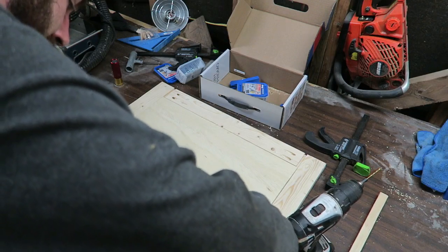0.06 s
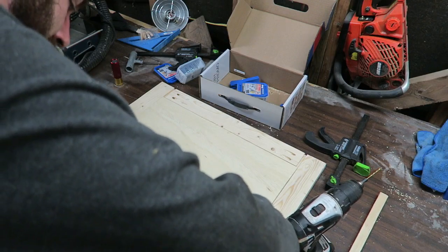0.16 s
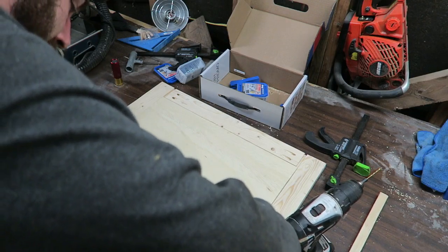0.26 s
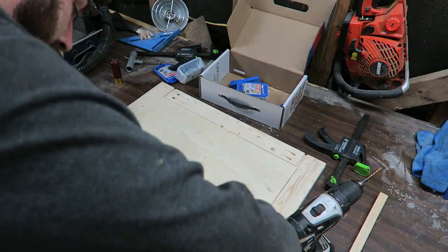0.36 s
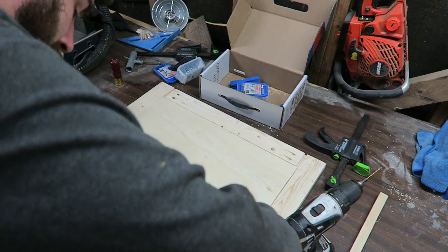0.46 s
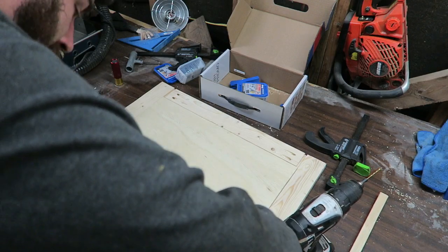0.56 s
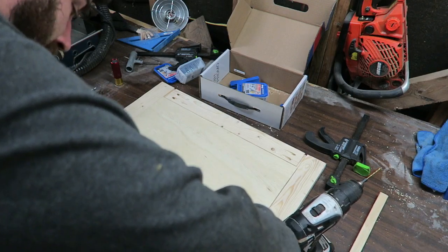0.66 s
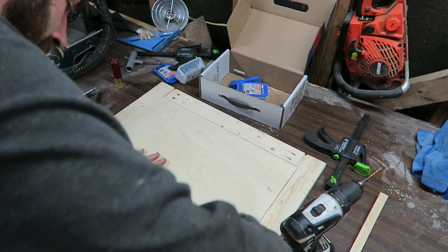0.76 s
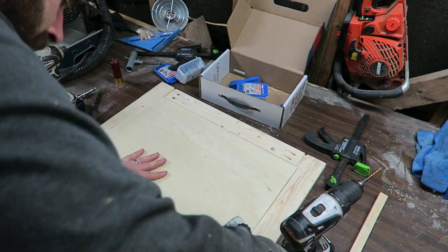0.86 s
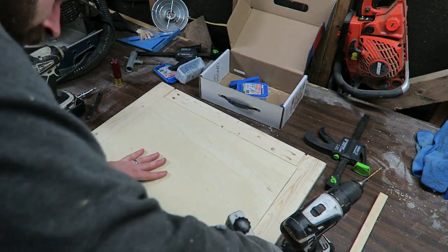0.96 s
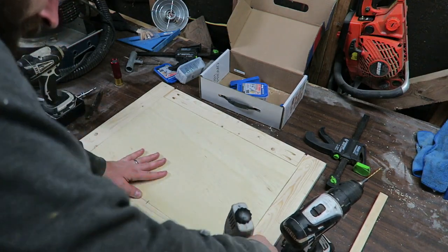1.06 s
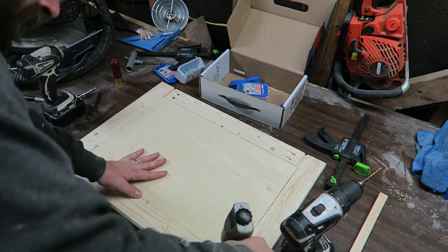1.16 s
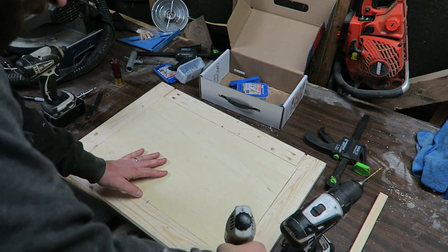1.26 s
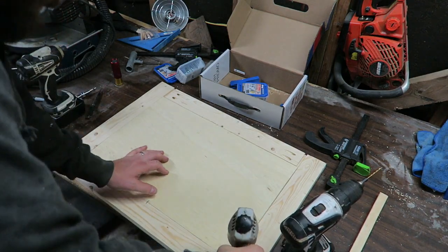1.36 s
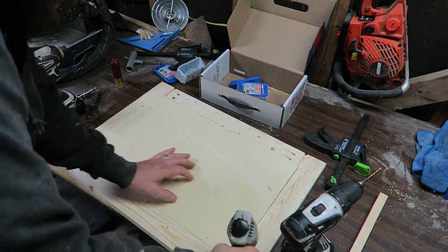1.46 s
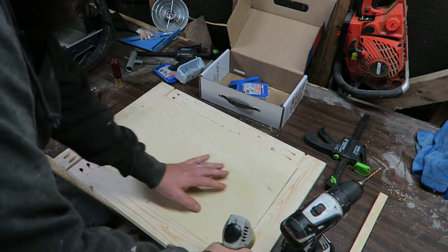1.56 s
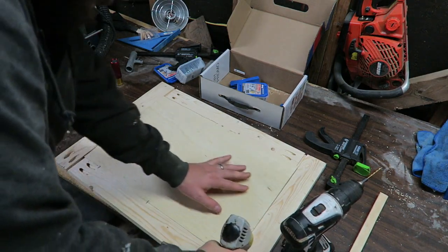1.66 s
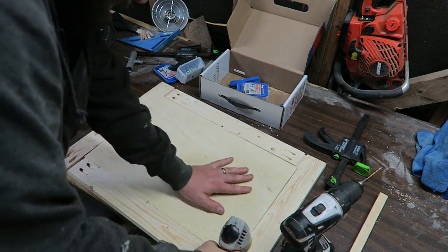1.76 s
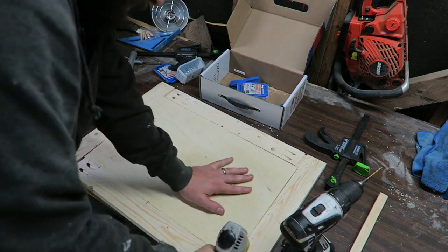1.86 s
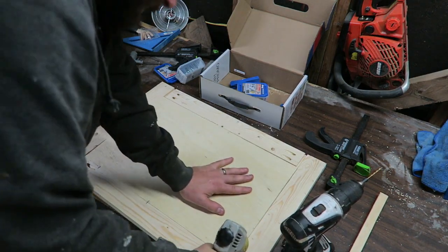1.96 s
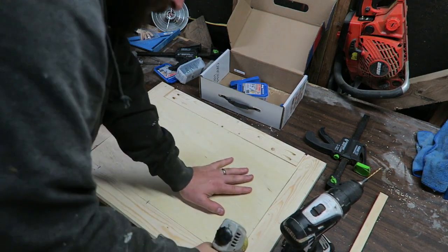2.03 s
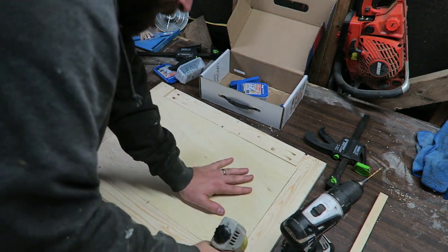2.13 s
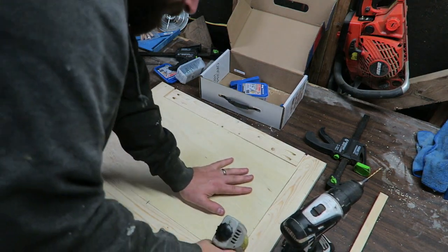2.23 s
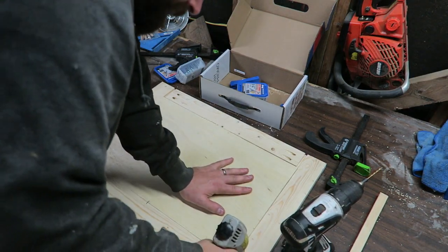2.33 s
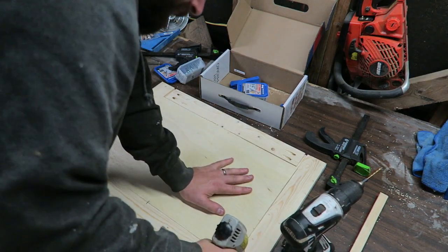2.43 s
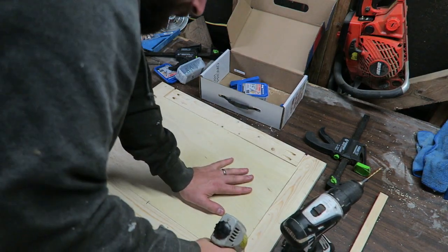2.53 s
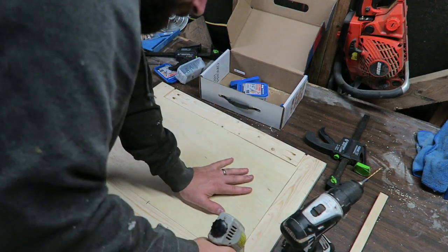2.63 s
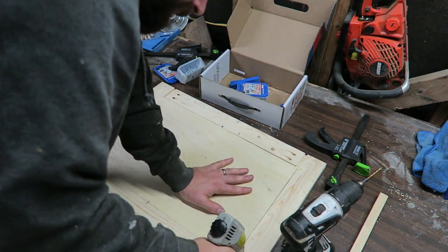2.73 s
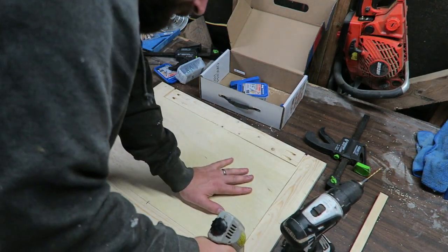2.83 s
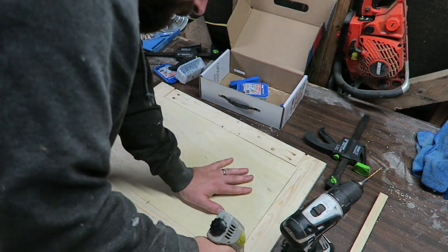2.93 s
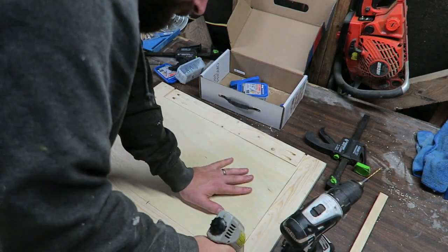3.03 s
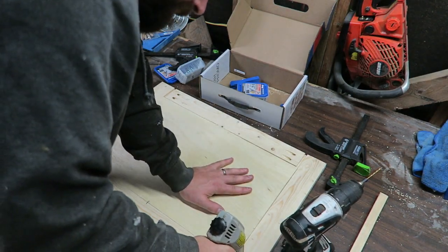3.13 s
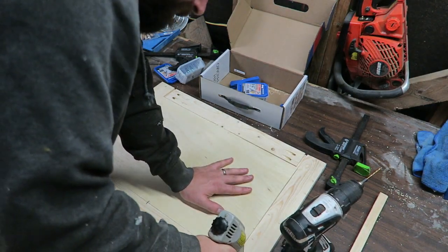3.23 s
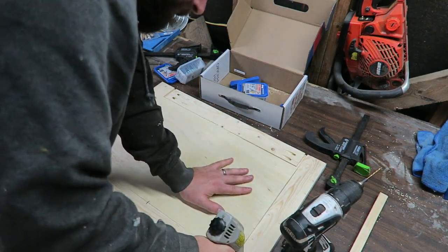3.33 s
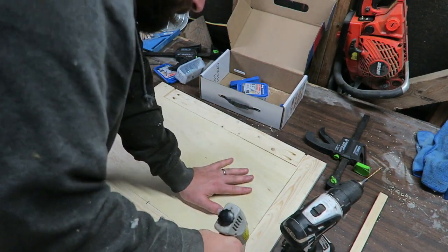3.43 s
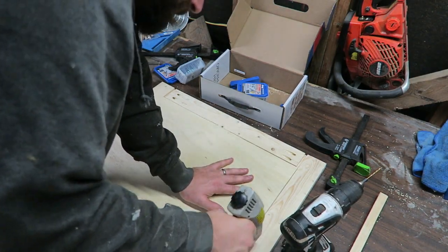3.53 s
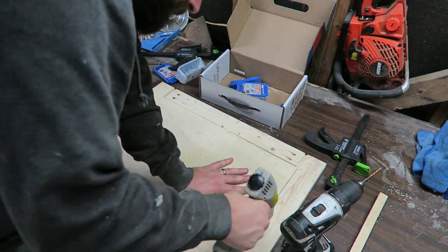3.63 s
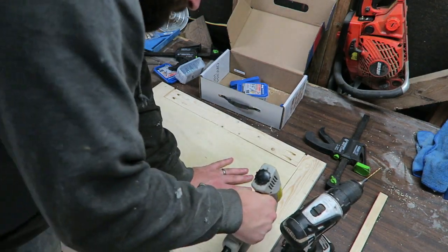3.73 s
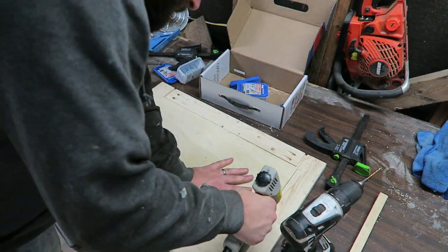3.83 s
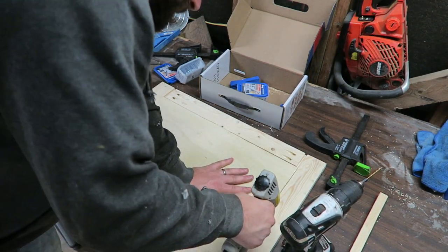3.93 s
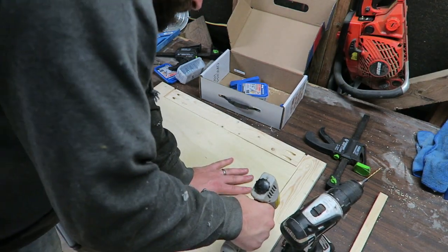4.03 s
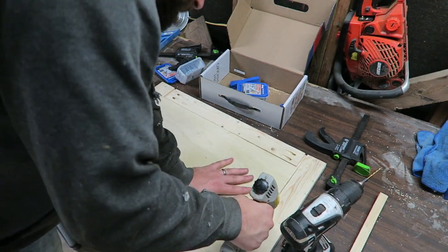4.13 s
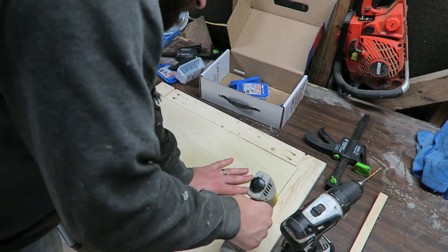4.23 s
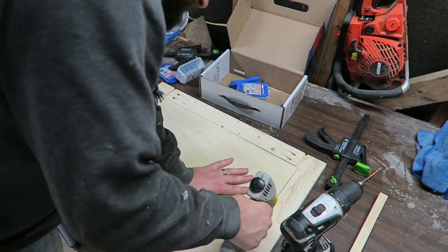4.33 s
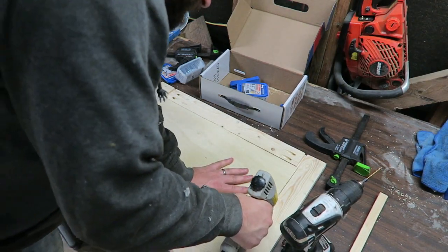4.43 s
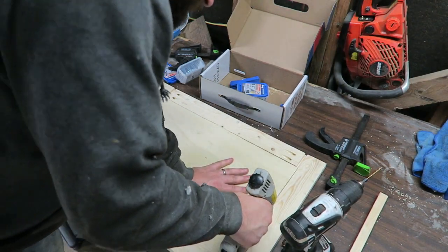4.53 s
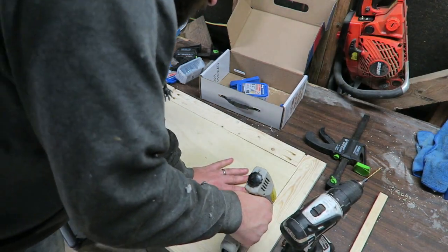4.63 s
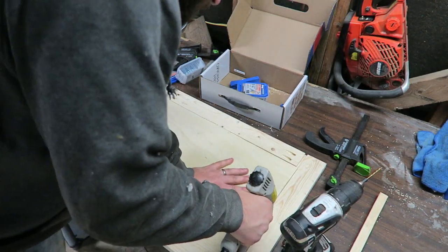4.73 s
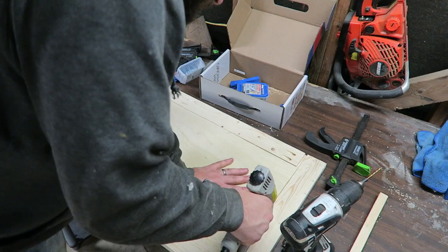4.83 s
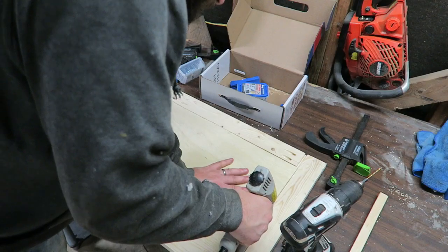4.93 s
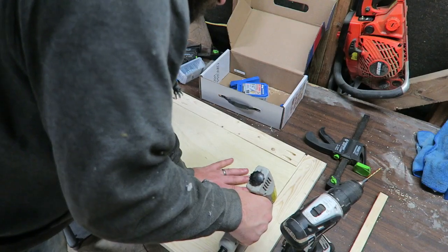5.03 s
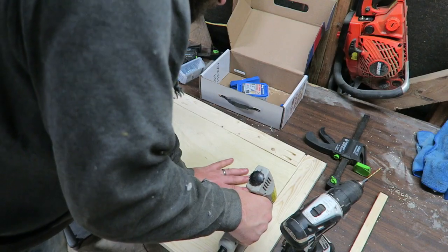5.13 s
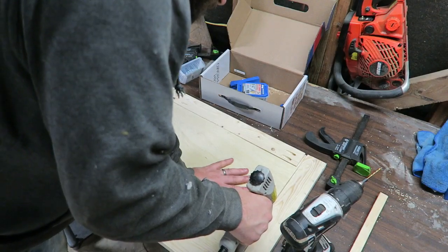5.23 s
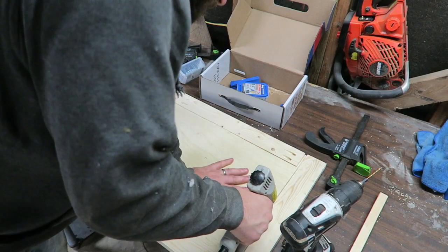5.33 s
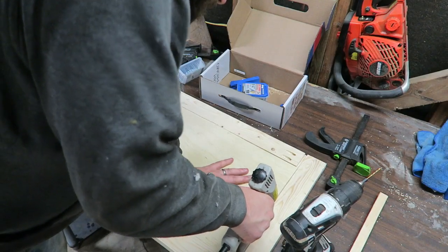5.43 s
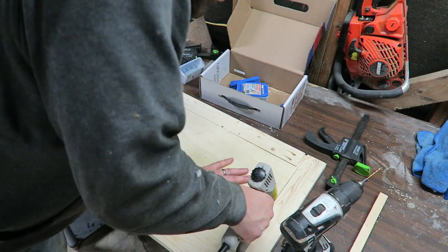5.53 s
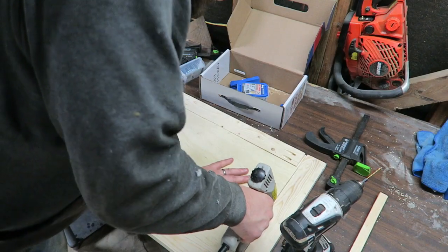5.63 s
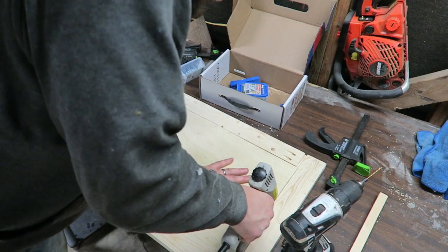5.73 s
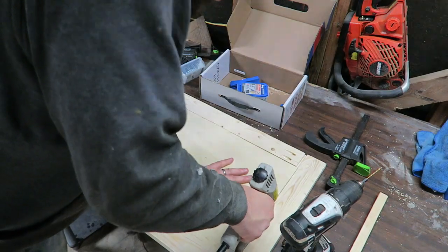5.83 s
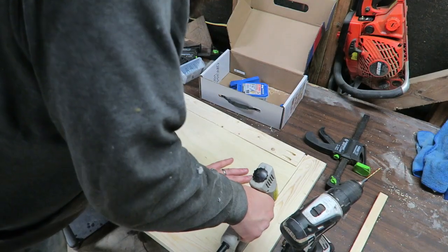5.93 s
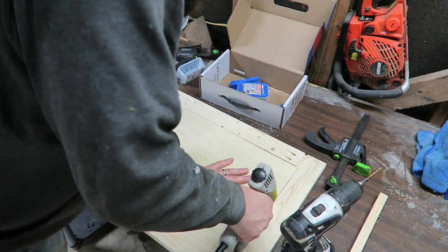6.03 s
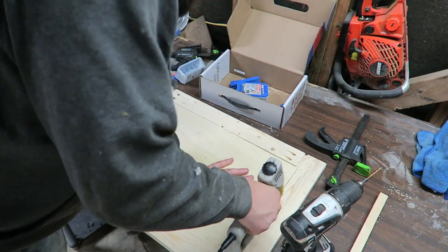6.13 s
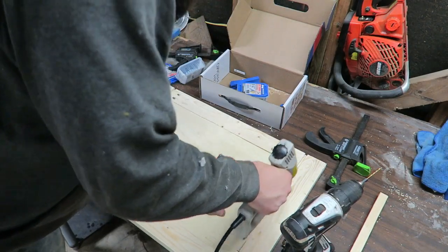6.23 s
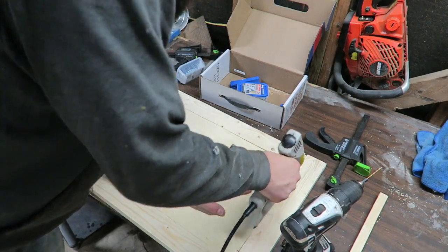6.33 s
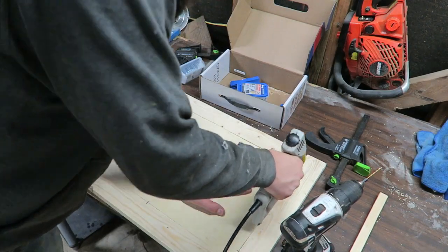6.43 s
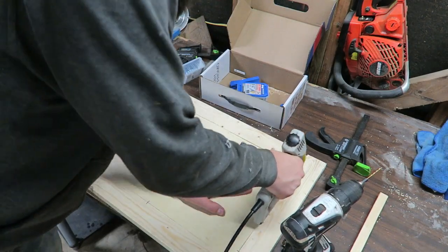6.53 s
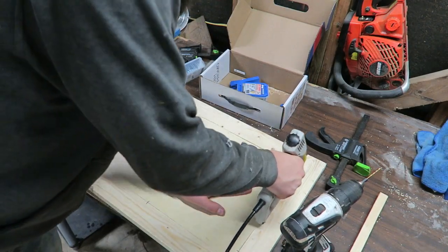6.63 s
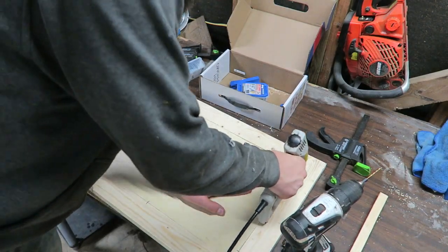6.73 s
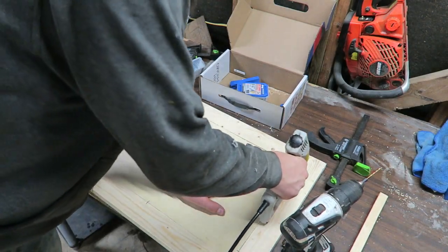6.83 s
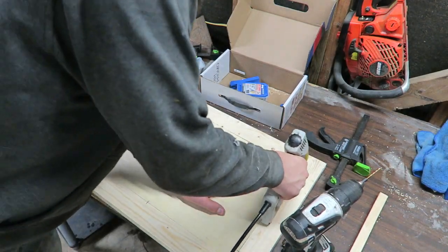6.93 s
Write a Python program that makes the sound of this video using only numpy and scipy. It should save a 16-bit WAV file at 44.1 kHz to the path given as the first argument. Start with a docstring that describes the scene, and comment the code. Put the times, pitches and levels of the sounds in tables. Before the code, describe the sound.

An electric staple gun fires into plywood three times, close to the microphone and nearly three seconds apart. Each shot is a sharp, slightly distorted snap with a woody thud and a brief workshop echo. After the first, the board shifts and knocks against the bench. Faint rubbing and light clicks lead to the other two shots, and a click and a dull bump follow the last, over a low room rumble.

```python
"""An electric staple gun fires three times, close up, into plywood on a workbench in a workshop.
Each shot is a trigger click, the plunger's rattling run and a blow that rings board, bench and room.
The blow overloads the recorder, whose gain then ducks and creeps back. Between shots the gun and
the board are knocked, rubbed and slid, a loose part clinks and the shell creaks, over a low rumble."""
import sys
import numpy as np
from scipy import signal
from scipy.fft import rfft, irfft
from scipy.io import wavfile
from scipy.ndimage import uniform_filter1d, minimum_filter1d

SR = 44100
rng = np.random.default_rng(int(sys.argv[2]) if len(sys.argv) > 2 else 0)


def generate_wav(signal):
    """Clip the signal to [-1, 1] and save it as 16-bit WAV at the path in sys.argv[1]."""
    frames = np.transpose(np.atleast_2d(signal))
    scaled = np.clip(frames, -1, 1) * 32767
    pcm = np.round(scaled).astype(np.int16)
    wavfile.write(sys.argv[1], SR, pcm)


N = 307817

# Tone of the room's air and of its rumble. Each row: frequency in Hz, level in dB.
AIR_COLOUR = [(12, -27.5), (25, -4), (112, -4), (213, -2), (452, -7.5), (1270, -15), (4680, -26),
              (8000, -36.5), (11000, -45), (15500, -66.5)]
RUMBLE_COLOUR = [(15, -4), (45, 1.5), (120, 2), (220, -11.5), (400, -37), (1500, -95)]
# Stereo image of the air. Each row: frequency in Hz, left-right likeness (1 is mono).
AIR_LIKENESS = [(30, 0.079), (125, .4), (290, 0.22), (1400, 0.17), (3100, .05), (7000, 0.84)]
# The rumble's swells and dips. Each row: time in seconds, level in dB.
RUMBLE_RIDE = [(0, -61.5), (.4, -62), (.9, -58.5), (1.5, -68.5), (2.2, -62.5), (2.7, -66), (3.2, -62.5),
               (3.9, -60), (4.5, -67.5), (4.95, -77), (5.2, -61.5), (5.9, -63), (6.4, -65.5), (6.98, -71)]
# Handling knocks. Each row: start in seconds, strength in dB, bench push in dB, tick in dB,
# pitch of the struck spot in Hz.
KNOCKS = [(.052, -48, -49, -69.5, 353), (0.119, -49, -38, -72.5, 124.8), (0.232, -48.5, -50.5, -54, 503),
          (.261, -46, -42, -54.5, 698), (.323, -59, -48.5, -60, 454), (.394, -44, -46.5, -57, 603),
          (.436, -52.5, -47.5, -57, 595), (.911, -45, -68, -53.5, 264.8), (0.973, -36.5, -51, -66, 372),
          (.988, -33, -56, -67, 410), (1.039, -59, -34, -70.5, 95), (1.15, -44.5, -44, -56, 238),
          (1.429, -50.5, -55, -54, 400), (1.545, -19.5, -20, -56, 439), (1.844, -49.5, -47, -55.5, 557),
          (1.861, -32, -34, -57, 524), (1.901, -28, -33, -58, 480), (1.95, -15, -18.5, -46, 340),
          (1.999, -32, -26, -61, 435), (2.076, -43, -32, -64, 433), (2.247, -45.5, -59, -65, 502),
          (2.619, -53.5, -51.5, -69, 700), (3.079, -57.5, -52.5, -59, 738), (3.167, -47.5, -52.5, -64, 447),
          (3.26, -51.5, -49.5, -55, 403.5), (4.059, -49.5, -55, -48, 388), (4.519, -42, -51, -66, 292),
          (4.869, -70, -57, -61, 1200), (5.117, -40, -49, -48.5, 521), (5.363, -50.5, -58, -65.5, 294),
          (5.429, -63, -54.5, -61.5, 1499), (5.884, -43.5, -57.5, -57.5, 528),
          (6.392, -19, -77, -43.5, 826), (6.479, -39.5, -70, -58, 260), (6.718, -23, -23, -65, 130),
          (6.789, -40, -27.5, -74, 109.2), (6.87, -47.5, -37, -60, 434)]
# Tone of a knock's tick and of its woody rattle. Each row: frequency in Hz, level in dB.
TICK_COLOUR = [(500, -18.5), (1200, 1.5), (2400, 2), (4000, -5.5), (7000, -17.5), (12000, -40),
               (16000, -66)]
CLATTER_COLOUR = [(150, -19), (450, 5), (900, 2), (1500, -9), (2500, -15), (5000, -24.5), (10000, -49),
                  (16000, -75.5)]
# Ring of the framed plywood and of the bench. Each row: pitch in Hz, level in dB, t60 in seconds.
BOARD_MODES = [(275, -0.5, 0.19), (302, 1.5, 0.06), (365, -6, 0.091), (433, 2.5, 0.29), (518, -0.5, 0.18),
               (660, -4.5, .08), (740, -5, 0.069), (820, -6, 0.38), (992.3, -8, 0.055), (1100, -7.5, 0.023),
               (1200, -8, 0.055)]
BENCH_MODES = [(74, -3.5, 0.079), (87, -7.5, 0.5), (90, -0.5, .6), (126, -5, 0.47), (150, 1, 0.28),
               (199, -5.5, .12)]
# Hands, sleeves and the gun's nose rubbing. Each row: start in seconds, hold in seconds, level in dB.
RUBS = [(.225, 0.015, -49.5), (.255, 0.011, -50), (.318, 0.0086, -64.5), (.388, 0.004, -48.5),
        (.87, .09, -59.5), (1.3, 0.18, -67), (2.238, .006, -63), (2.62, .02, -64), (2.66, 0.64, -71.5),
        (4.865, 0.01975, -84), (5.108, .035, -63.5), (5.355, .05, -70), (6.74, .05, -59.5),
        (6.85, .09, -61.5)]
# Rubs that swell as weight comes down. Each row: end in seconds, final level in dB.
PRESSES = [(.45, -42.5), (1.54, -46), (3.28, -48), (5.928, -55.5)]
# Tone of the rubbing. Each row: frequency in Hz, level in dB.
RUB_COLOUR = [(150, -23), (400, 4.5), (900, 0), (2000, -6), (4500, -15.5), (8000, -33), (14000, -65)]
# The shots. Each row: starts of trigger, plunger and blow in seconds, their three levels in dB,
# the blow's hold in seconds, board push in dB, echo send in dB, brightness in dB per octave,
# then the struck spot's pitch in Hz, level in dB and t60 in seconds.
SHOTS = [(.4515, .4652, .4715, -37, -25, -7.5, .0042, -7, 15.5, -.5, 299.4, -6.5, .11),
         (3.2817, 3.2912, 3.3022, -35, -31, -10, .008, -2.5, 15, .5, 295, -9, .16),
         (5.9289, 5.948, 5.9535, -31, -27, -9, .008, -4.5, 14, -.9, 490, -8, .25)]
# Ring of the switch and shell. Each row: pitch in Hz, width in Hz, level in dB.
TRIGGER_PEAKS = [(2120, 300, 2), (2560, 140, -3), (4170, 220, -6), (4460, 200, -7.5)]
# Tone of steel on staple and wood. Each row: frequency in Hz, level in dB.
SNAP_COLOUR = [(60, -30.5), (200, -12.5), (376, -2.5), (1060, -4), (2020, -6), (2760, -6), (3770, -9),
               (5050, -10), (9440, -19.5), (12400, -25), (13700, -28.5), (16000, -33.5)]
# Ring of a loose metal part. Each row: pitch in Hz, level in dB, t60 in seconds.
CLINK_MODES = [(1380, 3, 0.31), (2550, -1, 0.2), (3850, -4, 0.17), (5130, -4, 0.17)]
# Shoves of the board over the bench. Each row: start in seconds, hold in seconds, level in dB.
SLIDES = [(1.147, 0.041, -42.5), (1.365, .012, -55)]
# Ring of the sliding board. Each row: pitch in Hz, width in Hz, level in dB.
SLIDE_PEAKS = [(141, 8.4, 9.5), (244.5, 19, 9.5), (412, 32, -6.5), (672, 60, 0), (969, 23, -14),
               (1242, 50, -18), (1700, 120, -33)]
# Creaks in the grip. Each row: start in seconds, hold in seconds, level in dB.
CREAKS = [(2.79, 0.27, -83), (4.86, .44, -77)]
# Ring of the gun's shell. Each row: pitch in Hz, width in Hz, level in dB.
SHELL_PEAKS = [(1600, 400, -1.5), (3550, 350, 0.5), (4160, 340, -0.5)]
# The workshop's reverb time. Each row: frequency in Hz, t60 in seconds.
ECHO_DECAY = [(100, 0.94), (260, 0.5), (700, 0.55), (1840, 0.55), (4850, 0.45), (8000, 0.35), (12800, 0.1)]
# Stereo image of the echoes. Each row: frequency in Hz, left-right likeness (1 is mono).
ECHO_LIKENESS = [(500, 0.94), (2000, 0.63), (4500, 0.59), (7000, 0.75), (11000, 0.11)]
# Phase between the channels. Each row: frequency in Hz, the left's lead in radians.
LEFT_LEAD = [(100, 0.02), (1300, .05), (3000, 0.12), (4500, 1.2), (7000, 1.9), (10000, 1.9)]


def amp(db):
    return 10 ** (np.asarray(db) / 20)


def unit(x):
    return x / np.sqrt(np.mean(x ** 2) + 1e-20)


def curve_at(points, hz):
    f, value = np.transpose(points)
    return np.interp(np.log(hz + 1), np.log(f + 1), value)


def add(mix, s, sound):
    part = mix[max(round(s * SR), 0):][:len(sound)]
    part += sound[:len(part)]


def noise(colour, size, tilt_db=0):
    """Coloured noise at rms 1, tilted by tilt_db per octave about 1 kHz."""
    hz = np.fft.rfftfreq(size, 1 / SR)
    gain = amp(curve_at(colour, hz) + tilt_db * np.log2(hz / 1000 + .1))
    return unit(irfft(rfft(rng.standard_normal(size)) * gain, size))


def resonate(x, peaks):
    """The sum of x through each resonance."""
    return sum(amp(db) * signal.lfilter(*signal.iirpeak(hz, hz / width, SR), x)
               for hz, width, db in peaks)


def modes(table):
    """A struck body's ring: dying sines with a soft attack."""
    t = np.arange(SR // 2) / SR
    ring = sum(amp(db - 60 * t / t60) * np.sin(2 * np.pi * hz * t) for hz, db, t60 in table)
    return ring * np.minimum(t / .0048, 1) / sum(amp(row[1]) for row in table)


def push(contact_s):
    """An uneven force of area 1 over the contact time."""
    phase = np.arange(600) / (SR * max(contact_s, .0002))
    force = (1 + .5 * rng.standard_normal(600)) * np.sin(np.pi * np.minimum(phase, 1)) ** 2
    return force / abs(force).sum()


def slips(per_s, spread_db):
    """Friction as random small slips, a few of them large."""
    size = amp(spread_db * np.minimum(rng.exponential(1, N), 4)) * rng.choice([-1, 1], N)
    return size * (rng.random(N) < per_s / SR)


def strokes(rows, rise_s, fade_db_per_s):
    """Envelope of a series of strokes: each rises, holds and fades."""
    t = np.arange(N) / SR
    return sum(np.clip((t - s) / rise_s, 0, 1)
               * amp(db - fade_db_per_s * np.maximum(t - s - rise_s - hold, 0)) for s, hold, db in rows)


def room_tone():
    """The bed: softly mottled air noise, a lumpy rumble and a faint high whine."""
    frames, hz = N // 256 + 5, np.fft.rfftfreq(1024, 1 / SR)
    a, b, c, d, mottle = rng.standard_normal((frames, 513, 5)).T
    mottle = unit(uniform_filter1d(uniform_filter1d(mottle, size=10, axis=0), size=10, axis=1))
    likeness, left = curve_at(AIR_LIKENESS, hz)[:, None], a + 1j * b
    right = likeness * left + np.sqrt(1 - likeness ** 2) * (c + 1j * d)
    spectra = np.array([left, right]) * amp(curve_at(AIR_COLOUR, hz)[:, None] + 1.5 * mottle)
    air = unit(signal.istft(spectra, nperseg=1024, noverlap=768)[1][:, :N])
    t = np.arange(N) / SR
    ride = amp(np.interp(t, *np.transpose(RUMBLE_RIDE)))
    lumps = amp(2.1 * unit(uniform_filter1d(rng.standard_normal(N), size=2500)))
    centre = noise(RUMBLE_COLOUR, N)
    rumble = np.array([centre + .19 * noise(RUMBLE_COLOUR, N) for _ in "LR"]) * lumps * ride
    whine = unit(resonate(rng.standard_normal(N), [(13232, 25, 0)]))
    return amp(-62) * air + rumble + amp(-99) * whine


def knocks():
    """Each knock ticks, rattles and rings its spot. Returns that sound and the board and bench forces."""
    air, board, bench = np.zeros((3, N))
    t = np.arange(4096) / SR
    heft = .19  # the bench's share in the board's level: a weighty knock moves both
    for s, db, bench_db, tick_db, hz in KNOCKS:
        depth = 500 / hz  # deeper spots rattle duller, ring longer and are struck more softly
        tick = noise(TICK_COLOUR, len(t)) * np.minimum(t / .0029, 1) ** 2
        add(air, s, tick * amp(tick_db - 1500 * t))
        clatter = noise(CLATTER_COLOUR, len(t), tilt_db=-2 * np.log2(depth)) * np.minimum(t / .006, 1)
        add(air, s, clatter * amp(db - 12.5 - 551 * t))
        add(air, s, struck_spot(hz, db, t60=.044 * depth ** .55))
        board_db = (1 - heft) * db + heft * bench_db + 6.5
        add(board, s, amp(board_db) * push(contact_s=.0012 * depth ** .65))
        add(bench, s, amp(bench_db) * push(contact_s=.0062))
    return air, board, bench


def struck_spot(hz, db, t60):
    """The wood rings where it is hit; a pitch wobble gives the blur of close neighbouring modes."""
    t = np.arange(8192) / SR
    wobble = 1 + .05 * unit(uniform_filter1d(rng.standard_normal(len(t)), size=150))
    tone = np.sin(2 * np.pi * np.cumsum(hz * wobble) / SR)
    return amp(db - 60 * t / t60) * tone * np.minimum(t / .0025, 1)


def rubbing():
    """Clumpy friction noise, in strokes and in presses that swell and stop dead."""
    grains = uniform_filter1d(abs(slips(per_s=170, spread_db=7)), size=200)
    clumps = unit(signal.lfilter([1], [1, -.994], grains) + .011)
    t = np.arange(N) / SR
    presses = sum(amp(db - 600 * np.maximum(s - t, 0)) * (t < s) for s, db in PRESSES)
    rubs = strokes(RUBS, rise_s=.029, fade_db_per_s=350)
    return noise(RUB_COLOUR, N) * (.34 + .44 * clumps) * (rubs + presses)


def staple_gun():
    """Click, plunger run and blow. Returns that sound, the board and bench forces and the echo send."""
    air, board, bench, walls = np.zeros((4, N))
    t, rise_s = np.arange(8192) / SR, .0053
    for (click_s, run_s, blow_s, click_db, run_db, blow_db,
         hold_s, board_db, echo_db, tilt_db, *spot) in SHOTS:
        click = unit(resonate(rng.standard_normal(len(t)), TRIGGER_PEAKS))
        click_shape = (amp(-60 * t / .024) + .057 * amp(-60 * t / .061)) * np.minimum(t / .0008, 1)
        add(air, click_s, amp(click_db) * click * click_shape)
        # the plunger starts with a clack and rattles down its guide
        run_shape = (amp(-60 * t / .006) + .55) * (t < blow_s + rise_s - run_s)
        add(air, run_s, amp(run_db) * noise(SNAP_COLOUR, len(t), tilt_db) * run_shape)
        attack = np.minimum(t / rise_s, 1) ** .86
        decay = amp(-60 * np.maximum(t - rise_s - hold_s, 0) / .09)
        add(air, blow_s, amp(blow_db) * noise(SNAP_COLOUR, len(t), tilt_db) * attack * decay)
        add(board, blow_s, amp(board_db) * push(contact_s=.0012))
        # the plunger bottoms out
        add(board, blow_s + rise_s + hold_s / 2, amp(board_db + 1.5) * push(contact_s=.0011))
        add(air, blow_s + rise_s / 2, struck_spot(*spot))
        add(bench, blow_s + rise_s / 2, amp(board_db - 6.5) * push(contact_s=.0033))
        add(walls, blow_s - 256 / SR, amp(echo_db) * wall_bang(tilt_db))
    return air, board, bench, walls


def wall_bang(tilt_db):
    """The blow as it hits the walls: one short pulse of energy 1 with the snap's colour."""
    hz = np.fft.rfftfreq(1024, 1 / SR)
    spectrum = amp(curve_at(SNAP_COLOUR, hz) + tilt_db * np.log2(hz / 1000 + .093))
    pulse = np.fft.fftshift(irfft(spectrum))
    return pulse / np.linalg.norm(pulse)


def clink():
    """A loose metal part is jolted once and rings."""
    air = np.zeros(N)
    add(air, s=.912, sound=amp(-47.5) * modes(CLINK_MODES))
    return air


def board_slide():
    """Soft, uneven slips ring the board as it is pushed over the bench."""
    soft_slips = signal.lfilter(*signal.butter(2, 1800, fs=SR), slips(per_s=1500, spread_db=2.5))
    return unit(resonate(soft_slips, SLIDE_PEAKS)) * strokes(SLIDES, rise_s=.021, fade_db_per_s=110.5)


def shell_creaks():
    """Sparse slips in the grip ring the gun's shell."""
    ring = resonate(resonate(slips(per_s=40, spread_db=2), SHELL_PEAKS), SHELL_PEAKS)
    return unit(ring) * strokes(CREAKS, rise_s=.011, fade_db_per_s=300)


def workshop_echoes(send):
    """Stereo reverb from sparse reflections of random sign, each band dying at its own speed."""
    taps = np.zeros((6, SR))
    arrivals = np.arange(120, SR - 20, 20) + rng.integers(0, 20, (6, (SR - 121) // 20))
    np.put_along_axis(taps, arrivals, rng.choice([-1., 1.], arrivals.shape), 1)
    hz, t, spectra = signal.stft(taps, SR, nperseg=256)
    likeness, left = curve_at(ECHO_LIKENESS, hz)[:, None], spectra[:3]
    right = likeness * left + np.sqrt(1 - likeness ** 2) * spectra[3:]
    decay = amp(-60 * t / curve_at(ECHO_DECAY, hz)[:, None])
    tails = signal.istft(np.array([left, right]) * decay, SR, nperseg=256)[1][..., :SR * 2 // 3]
    wet = signal.fftconvolve(send[None, None], tails / np.linalg.norm(tails[0, 0]), axes=2)[..., :N]
    # three tails take turns, so that no pitch lingers
    turns = np.cos(2 * np.pi * (23 * np.arange(N) / SR + np.arange(3)[:, None] / 3)) * np.sqrt(2 / 3)
    return (wet * turns).sum(1)


def scene():
    """Shots and knocks drive the same board and bench; handling, echoes and room tone join them."""
    shots, shots_on_board, shots_on_bench, bangs = staple_gun()
    knocking, knocks_on_board, knocks_on_bench = knocks()
    board = signal.fftconvolve(shots_on_board + knocks_on_board, modes(BOARD_MODES))[:N]
    bench = signal.fftconvolve(shots_on_bench + knocks_on_bench, modes(BENCH_MODES))[:N]
    near = knocking + board + board_slide() + rubbing() + shell_creaks() + clink()
    echoes = workshop_echoes(bangs + amp(-9.5) * shots + amp(-10.5) * near)
    left, right = shots + near + bench + echoes
    lag = np.exp(-1j * curve_at(LEFT_LEAD, np.fft.rfftfreq(2 ** 19, 1 / SR)))
    late_right = irfft(rfft(right, 2 ** 19) * lag)[:N]
    return np.array([amp(.02) * left, late_right]) + room_tone()


def record(dry):
    """Gain control ducks after loud sound, holds and creeps back; the blows still clip."""
    threshold_db, drive_db, hiss_db, top_hz = -23, 11, -118, 15700
    hold, release_db_per_s = int(.6 * SR), 6.75
    dry = signal.lfilter(*signal.butter(2, 45, "high", fs=SR), dry)
    power = signal.lfilter([.004], [1, -(1 - .004)], (dry ** 2).mean(0))
    power_db = 10 * np.log10(power + 1e-12)
    held_db = -minimum_filter1d(-power_db, size=hold, origin=(hold - 1) // 2, mode="nearest")
    release_db = np.arange(N) * release_db_per_s / SR
    envelope_db = np.maximum.accumulate(held_db + release_db) - release_db
    duck_db = signal.lfilter([.0016], [1, -(1 - .0016)], np.maximum(envelope_db - threshold_db, 0))
    hot = dry * amp(drive_db - duck_db) + amp(hiss_db) * rng.standard_normal(dry.shape)
    # the overload upsets the channel balance: it leaks, dulled, into the left-right difference
    excess = (hot - np.clip(hot, -.8, .8)).mean(0)
    spill = signal.lfilter(*signal.butter(3, [110, 1600], "band", fs=SR), abs(excess) + .3 * excess)
    clipped = np.clip(hot + amp(7) * np.array([spill, -spill]), -.95, .95)
    clipped = signal.lfilter(*signal.butter(1, 25, "high", fs=SR), clipped)
    high_cut = signal.firwin(255, top_hz, window=("kaiser", 6), fs=SR)
    return signal.oaconvolve(clipped, high_cut[None], "same")


dry = scene()
out = record(dry)
generate_wav(out)
```